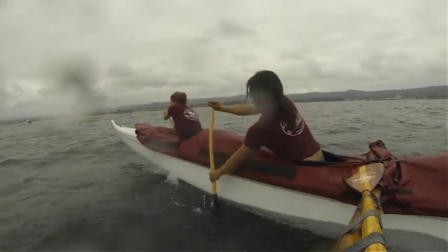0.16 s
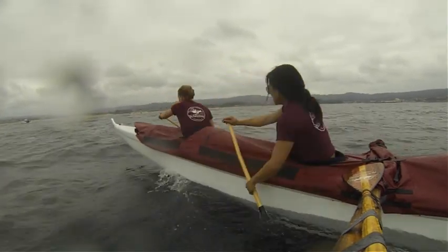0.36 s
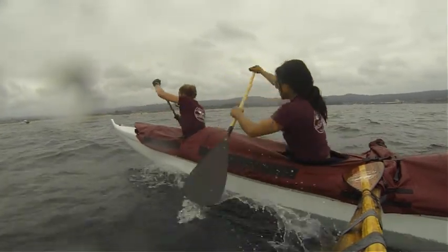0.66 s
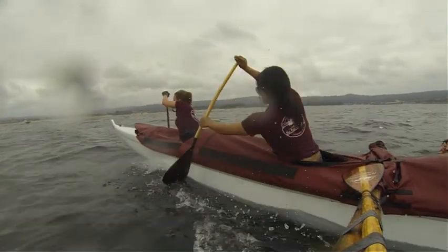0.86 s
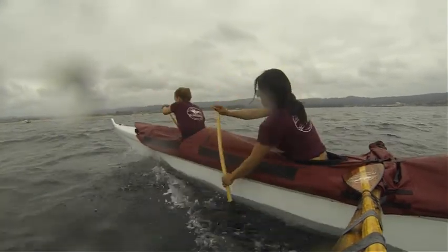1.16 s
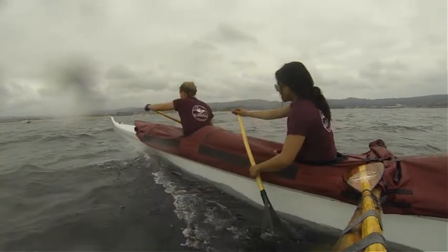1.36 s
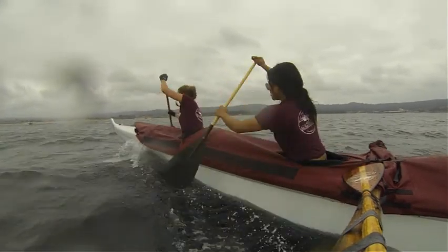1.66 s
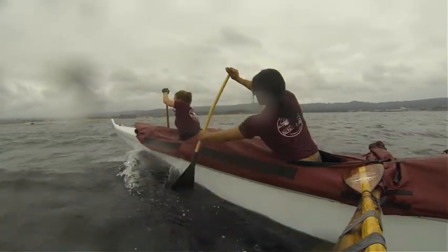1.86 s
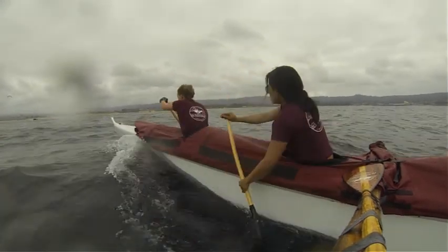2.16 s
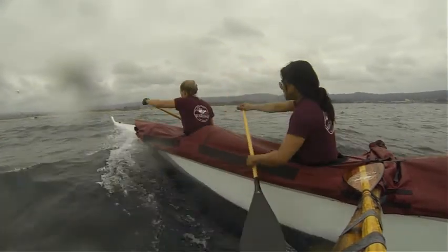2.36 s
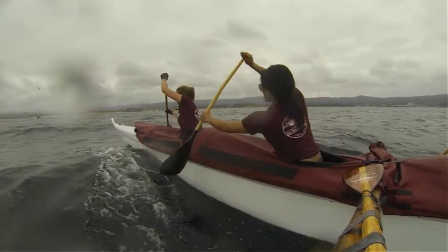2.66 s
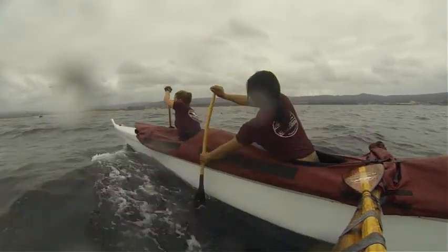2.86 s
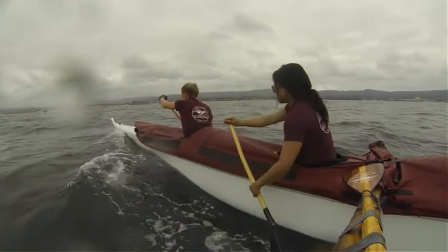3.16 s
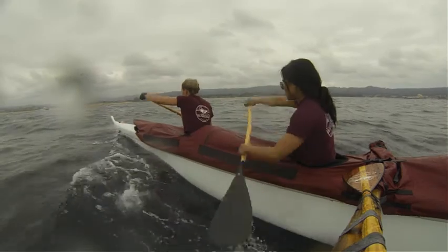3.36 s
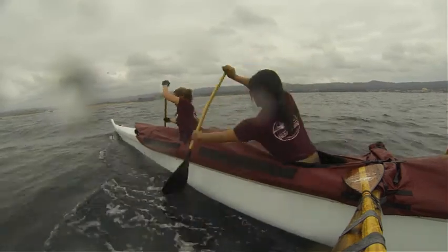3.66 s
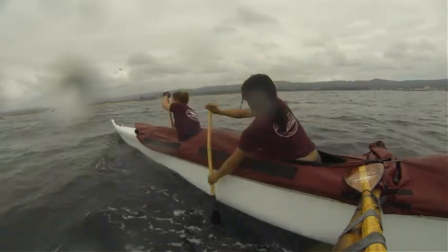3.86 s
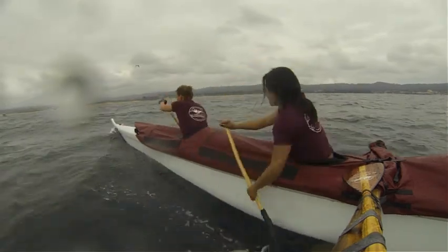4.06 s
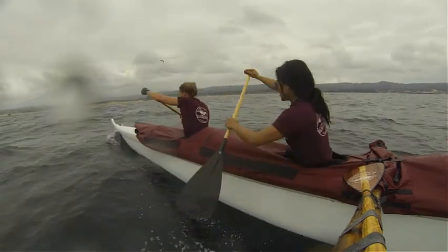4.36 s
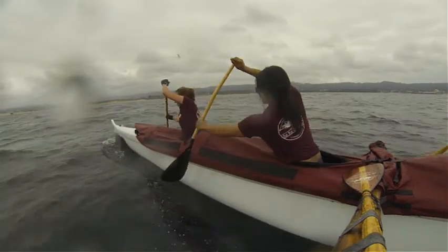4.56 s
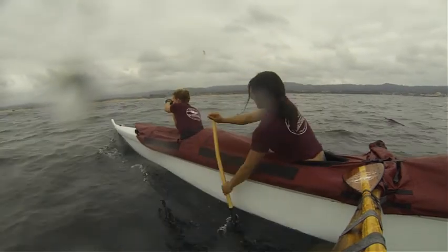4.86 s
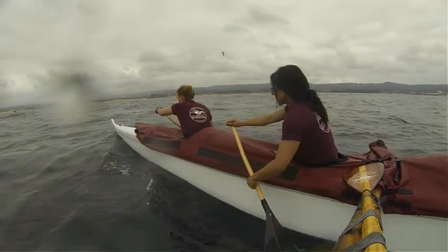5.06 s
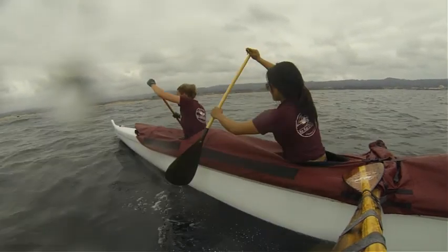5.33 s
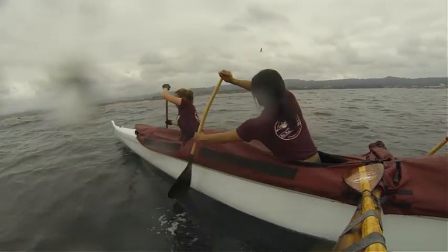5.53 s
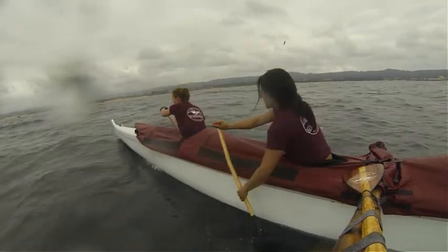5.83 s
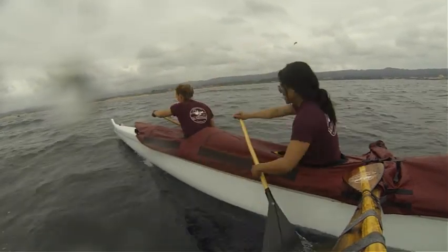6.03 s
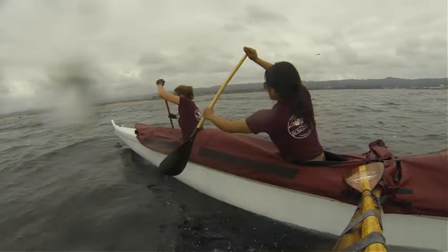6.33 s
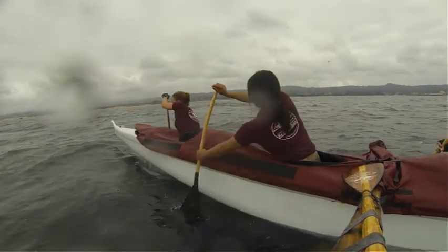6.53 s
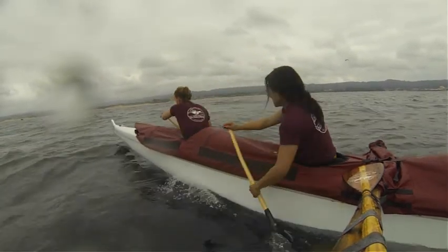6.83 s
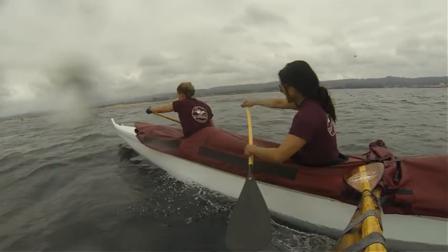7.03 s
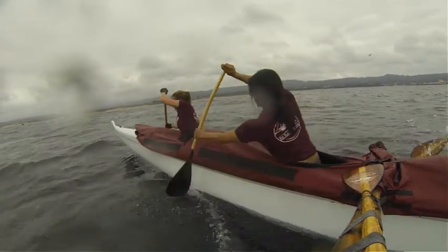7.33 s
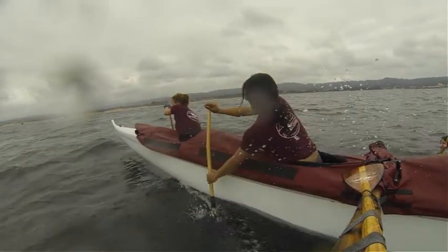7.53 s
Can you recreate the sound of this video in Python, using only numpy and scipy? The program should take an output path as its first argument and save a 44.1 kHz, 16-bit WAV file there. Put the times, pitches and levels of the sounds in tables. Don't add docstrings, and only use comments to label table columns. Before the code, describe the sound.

Heard through a sealed camera fixed to a canoe's outrigger arm: waves slap the hollow hull with low, drumlike booms, wavelets gulp and gurgle, and the float thuds deeply. A hard slap at 2.5 seconds knocks the shell, paddle splashes follow, slaps crowd together after 5.5, and a loud splash comes near the end. Thin spray patters throughout.

```python
import sys
import numpy as np
from scipy import signal
from scipy.fft import rfft, irfft, next_fast_len
from scipy.io import wavfile
from scipy.ndimage import uniform_filter1d, map_coordinates

SR = 44100
rng = np.random.default_rng(int(sys.argv[2]) if len(sys.argv) > 2 else 0)


def file_out(sig):
    cols = np.atleast_2d(sig).T
    lim = np.clip(cols, -1, 1)
    pcm = np.round(lim * 32767).astype(np.int16)
    wavfile.write(sys.argv[1], SR, pcm)


def boost_factor(decibels):
    exponent = np.asarray(decibels, float) / 20
    return 10 ** exponent


N = 339040
T = np.arange(N) / SR

# time_s, level_db
SPRAY_LEVEL = [(0.0, -51.5), (0.51, -57.5), (0.79, -56), (1.26, -58.5), (1.43, -61), (2.08, -55.5),
               (2.78, -58.5), (3.25, -57), (3.53, -56.5), (4.37, -56.5), (4.45, -57.5), (4.63, -51.5),
               (5.42, -56), (5.67, -49), (6.19, -54), (6.29, -58.5), (7.24, -54), (7.69, -54.5)]
# start_s, length_s, level_db, gurgle_rel_db
SPRAY_SHEETS = [(0.005, 0.073, -46, 1), (0.522, 0.11, -48, 0.5), (0.747, 0.04, -51, 1.5),
                (0.824, 0.1, -47, -1), (0.945, 0.087, -50, -2), (1.545, 0.036, -50, 0),
                (1.862, 0.063, -40.5, -1), (1.955, 0.024, -44, 3.5), (2.084, 0.014, -46, -6),
                (2.51, 0.025, -45, 3), (3.106, 0.12, -44, 1), (3.434, 0.079, -40, -4.5),
                (3.772, 0.017, -43, -4), (3.945, 0.069, -45.5, -1.5), (4.053, 0.044, -45, -1),
                (4.444, 0.23, -45, 3), (4.74, 0.14, -45, 3.5), (4.931, 0.071, -47.5, 3),
                (5.045, 0.23, -45, -5), (5.428, 0.086, -50.5, 4.5), (5.688, 0.03, -55, 4),
                (5.81, 0.055, -46, 2.5), (6.253, 0.086, -43, -0.5), (6.52, 0.12, -47, 1),
                (6.851, 0.061, -48, -2.5), (7.289, 0.084, -48, -4), (7.52, 0.05, -41.5, -3.5),
                (7.656, 0.015, -55.5, -11)]
# freq_hz, gain_db
FIZZ_COLOUR = [(1060, -25), (1800, 3.5), (2360, -3.5), (3080, -1), (3900, -7.5), (4170, -7.5), (5210, -9.5),
               (5960, -13.5), (7800, -10.5), (8980, -13.5), (11700, -62), (19800, -120)]
# start_s, peak_db, pitch_hz
FINE_SPRAY = [(0.192, -50, 2330), (0.2179, -54, 2550), (0.2483, -53, 2550), (0.5018, -55, 2600),
              (0.5447, -49.5, 2370), (1.0016, -47.5, 3200), (1.2291, -50.5, 2400), (1.6606, -48, 3100),
              (1.8168, -50, 3170), (2.1869, -51, 2470), (2.5062, -53.5, 2490), (2.9377, -48, 3230),
              (3.1448, -41, 3150), (3.3588, -55, 2560), (3.4421, -51.5, 2990), (3.7658, -55, 2690),
              (3.8302, -47, 3290), (3.9394, -45, 3270), (3.9779, -49.5, 2840), (4.4897, -52, 2560),
              (5.0823, -47, 2650), (5.1223, -52, 3200), (5.3532, -56, 2300), (5.7653, -52.5, 2350),
              (5.8012, -50, 3200), (5.8676, -53, 3050), (6.2018, -56, 2990), (6.2482, -50, 2450),
              (6.3555, -54, 3150), (6.5959, -51, 3090), (6.7082, -47, 3180), (6.8578, -45.5, 3130),
              (6.9037, -53, 2750), (6.979, -51, 3060), (7.2814, -50, 3210), (7.4096, -50.5, 2890),
              (7.4525, -48, 2460), (7.5283, -48.5, 2480), (7.5582, -50, 3060), (7.6016, -52.5, 2360)]
# start_s,
# peak_db, pitch_hz, t60_s
GLINTS = [
    (3.42, -53, 5300, .12),
    (3.475, -52, 5250, .12),
    (3.767, -54.5, 5300, .09),
    (2.8, -46.5, 4200, .04),
    (7.53, -52, 5250, .07),
]
# start_s, peak_db, pitch_hz
SPLASHES = [(0.1989, -44, 1270), (0.519, -35.5, 1370), (0.5801, -41, 1320), (0.751, -36, 1287),
            (0.818, -42.5, 1397), (0.889, -34, 1280), (1.231, -42, 1340), (1.5569, -40, 1330),
            (1.6931, -43.5, 1420), (1.8554, -36.5, 1266), (1.9031, -34, 907), (1.957, -35.5, 1474),
            (2.1874, -42, 1386), (2.5042, -37, 1010), (2.597, -46, 1057), (3.1238, -32, 1380),
            (3.1872, -36, 1437), (3.2328, -39, 1265), (3.3603, -37, 1326), (3.4206, -36.5, 1500),
            (3.474, -29, 1340), (3.5133, -28, 1290), (3.7663, -29.5, 1460), (3.9396, -43, 1130),
            (4.0632, -37, 1344), (4.2482, -43, 1360), (4.362, -43, 977), (4.4378, -37.5, 1350),
            (4.4884, -30, 1344), (4.726, -42, 1240), (4.784, -33, 1300), (4.9332, -37.5, 1447),
            (5.0785, -35, 1412), (5.1826, -33, 1433), (5.4296, -31, 1380), (5.4979, -36, 1300),
            (5.6301, -41, 1300), (6.2555, -33, 1410), (6.3193, -33, 1396), (6.5924, -43, 1280),
            (6.6396, -40, 1210), (6.7102, -36.5, 1250), (6.854, -41, 1230), (6.9094, -44, 1260),
            (7.285, -41, 1010), (7.3206, -38.5, 1230), (7.4097, -40, 1540), (7.5249, -25, 1350),
            (7.5901, -36, 1210), (7.6532, -33, 1350)]
# start_s, peak_db,
# pitch_hz, t60_s
MORE_SPLASHES = [(3.146, -28, 1600, 0.078), (3.14, -33, 790, .06), (3.455, -33.5, 1550, .07),
                 (4.55, -32, 1400, .08), (5.045, -34, 1300, 0.053), (5.812, -21, 480, 0.11),
                 (5, -39, 1100, 0.09), (6.64, -41, 1000, 0.067), (7.528, -31.5, 1200, 0.035),
                 (4.575, -34, 1500, 0.077), (4.68, -34, 1250, .06), (5.7, -39, 1330, .07),
                 (7.553, -36.5, 1650, 0.053), (3.772, -31, 1300, 0.077), (7.2, -41.5, 1400, 0.091), ]
# centre_hz, width_hz, gain_db
CASE_MODES = [(993, 390, -5), (1340, 240, 1), (1558, 303, -3.5)]
# centre_hz, width_hz, gain_db
PANEL_MODES = [(490, 52, 2), (708.5, 30, 3.5), (924, 200, -9)]
# start_s, peak_db, centre_hz, t60_s
PANEL_GULPS = [(0.089, -32, 990, 0.06), (0.6, -33.5, 870, 0.062), (1.231, -36.5, 683, 0.053),
               (6.585, -34, 710, 0.12), (2.185, -30, 487, 0.14), (2.392, -28, 493, 0.13),
               (2.394, -32, 720, .07), (2.504, -17.5, 698, 0.1), (2.506, -18.5, 495, .1),
               (3.084, -28, 748, 0.06), (3.138, -29, 490, 0.078), (3.521, -24.5, 757, 0.12),
               (3.776, -35, 714, 0.32), (3.935, -37, 480, 0.067), (4.072, -38, 710, 0.16),
               (4.516, -23, 460, 0.08), (4.532, -23.5, 656, 0.081), (4.796, -40, 692, 0.1),
               (4.868, -32.5, 700, 0.12), (5.006, -33, 470, 0.11), (5.294, -30, 713, 0.1),
               (5.75, -31, 560, 0.1), (5.495, -27.5, 445, 0.21), (5.571, -27.5, 672, 0.24),
               (5.832, -19.5, 674, 0.12), (5.804, -16.5, 699, 0.089), (6.261, -28, 680, 0.13),
               (6.336, -27, 756, 0.091), (0.746, -41, 513, 0.061), (0.82, -39, 667, 0.11),
               (0.864, -30, 500, 0.071), (0.907, -37, 490, .07), (1.495, -41, 514, 0.084),
               (1.903, -33.5, 860, 0.061), (1.968, -29.5, 676, 0.22), (2.068, -40, 694, 0.045),
               (3.029, -35, 527, 0.064), (4.636, -29, 520, 0.068), (4.712, -35, 503, 0.06),
               (5.124, -32, 718, 0.23), (6.852, -38, 697, 0.077), (7.273, -41.5, 549, 0.06),
               (7.377, -36, 530, 0.08), (7.57, -27.5, 686, 0.16), (6.362, -35, 696, 0.072),
               (7.527, -39, 547, 0.062)]
# centre_hz, width_hz, gain_db
FLANK_MODES = [(324.4, 91, -1), (405, 37, -0.5)]
# start_s, peak_db
FLANK_LICKS = [(0.333, -44), (0.794, -43), (0.883, -37), (1.894, -37.5), (2.2, -36.7), (2.242, -37.3),
               (3.004, -38), (3.161, -38), (3.979, -40), (4.045, -38), (4.215, -35.5), (4.733, -36),
               (5.413, -40), (7.072, -39), (7.28, -35.5), (7.524, -39.5)]
# time_s, level_db
SWAY_LEVEL = [(0.0, -22), (0.25, -23), (0.45, -39), (0.83, -19), (1.09, -38), (1.39, -28), (1.93, -40),
              (3.51, -25), (3.94, -45), (4.3, -27), (4.9, -24), (5.03, -36), (5.67, -27), (5.8, -36),
              (6.4, -26), (6.55, -40), (7.54, -24), (7.69, -40)]
# start_s, length_s, level_db
HEAVES = [(0.037, 0.066, -27), (0.237, 0.53, -33.5), (0.935, 0.083, -31), (1.207, 0.041, -42),
          (1.51, 0.2, -37.5), (2.324, 0.44, -34.5), (2.804, 0.066, -45.5), (3.031, 0.49, -36),
          (3.726, 0.078, -34), (3.875, 0.15, -41.5), (4.217, 0.077, -28.5), (4.319, 0.8, -39),
          (5.514, 0.056, -40), (5.92, 0.41, -42), (6.692, 0.033, -36), (6.913, 0.14, -30.5),
          (7.377, 0.26, -32)]
# start_s, peak_db, pitch_hz, t60_s
FLOAT_THUDS = [(0.386, -22, 76.7, 0.23), (0.6, -28, 57, 0.13), (1.498, -30.5, 87, 0.091),
               (2.382, -27.5, 57.7, 0.37), (2.503, -33.5, 83, 0.12), (3.047, -27, 112, 0.24),
               (3.349, -23, 57, 0.15), (4.198, -29, 74.4, 0.094), (4.93, -33, 104.4, 0.25),
               (5.988, -21.5, 72.7, 0.15), (6.954, -20.5, 59.3, 0.079)]
# centre_hz, width_hz, gain_db
ARM_SLOW_MODES = [(17.32, 4.6, 0)]
ARM_FAST_MODES = [(33.4, 9.8, 3.5), (92, 74, -10)]
# time_s, level_db
CHOP_LEVEL = [(0.0, -25.5), (0.15, -38), (0.49, -39), (0.56, -38), (1.35, -42.5), (1.99, -39),
              (2.48, -37.5), (2.78, -41), (3.08, -43.5), (3.32, -40), (3.81, -38), (4.67, -32.5),
              (4.97, -35), (5.33, -39), (5.85, -39.5), (6.38, -37), (7.02, -40.5), (7.69, -39.5)]
# start_s, length_s, level_db
HULL_WAVES = [(0.005, 0.131, -27.5), (0.382, 0.044, -32), (0.527, 0.029, -34.5), (0.586, 0.03, -36),
              (0.84, 0.13, -32.5), (1.905, 0.049, -35), (1.984, 0.047, -36.5), (2.146, 0.036, -38.5),
              (2.379, 0.05, -35.5), (2.514, 0.1, -28.5), (3.136, 0.15, -29.5), (3.356, 0.19, -31.5),
              (3.707, 0.044, -37.5), (4.082, 0.16, -31.5), (4.308, 0.052, -36.5), (4.46, 0.032, -41),
              (4.51, 0.079, -35.5), (4.628, 0.051, -31.5), (4.726, 0.046, -36), (4.8, 0.03, -40),
              (4.865, 0.089, -35), (4.975, 0.051, -34.5), (5.093, 0.071, -33), (5.524, 0.036, -35),
              (5.571, 0.16, -32), (5.811, 0.232, -29), (6.955, 0.062, -30.5), (7.011, 0.03, -45),
              (7.361, 0.036, -33.5), (7.55, 0.04, -36)]
# centre_hz, width_hz, gain_db
UPPER_DRUM_MODES = [(232.6, 15.3, -2), (320, 122, -16), (376, 72, -15)]
LOWER_DRUM_MODES = [(143.5, 11, -10), (192.8, 25, -21.5)]
# centre_hz, width_hz, gain_db
DRUM_CORE = [(232, 110, 0)]
# start_s, peak_db, flank_rel_db, t60_s
WAVE_SLAPS = [(0.056, -12.5, -22, 0.23), (0.189, -26, -16, 0.086), (0.008, -22, -12, 0.23),
              (0.394, -13.5, -13, 0.17), (0.523, -29, -5.5, 0.21), (0.586, -24, -17, 0.14),
              (0.881, -18, -18, 0.14), (1.646, -30.5, -5.5, 0.2), (1.87, -25, -22, 0.56),
              (2.357, -25, -15, 0.4), (2.51, -9, -17.5, 0.14), (3.111, -21, -16, 0.26),
              (3.158, -15.5, -13, 0.22), (5.612, -16.5, -24, 0.18), (3.637, -20.5, -15, 0.05),
              (3.69, -22.5, -33, 0.17), (4.194, -14.5, -27, 0.14), (4.379, -17.5, -25.5, 0.19),
              (4.529, -22, -12.5, 0.25), (4.769, -14, -20, 0.13), (4.895, -16.5, -31, 0.1),
              (5.583, -18, -13, 0.3), (5.697, -26, -10, 0.62), (5.816, -21, -6, 0.2),
              (5.994, -18, -13.5, 0.068), (6.278, -26, -15, 0.29), (6.768, -26, -31, 0.067),
              (6.874, -25.5, -17.5, 0.13), (6.96, -18, -15.5, 0.087), (0.3, -24.5, -33, 0.25),
              (2.185, -29.5, -8, 0.089), (3.453, -28.5, -5.5, 0.12), (4.082, -34, -4, 0.086),
              (4.642, -22, -13, 0.17), (4.58, -22, -22, .25), (5.74, -28, -9.5, 0.063),
              (6.086, -30, -11, 0.11), (6.717, -29, -12, 0.18), (7.27, -32.5, -7.5, 0.17),
              (1.513, -31.5, -6.5, 0.076), (2.61, -26.5, -20, 0.11)]
# start_s, peak_db
DRUM_TAPS = [(0.753, -31.5), (0.997, -27.5), (1.2, -32.5), (1.295, -33), (1.932, -26), (2.066, -30.5),
             (2.134, -30.5), (2.274, -31.5), (2.543, -22.5), (2.657, -33.5), (3.517, -28.5), (3.583, -30),
             (3.81, -27), (3.971, -32.6), (4.302, -29.0), (4.478, -26.5), (4.686, -23.5), (5.042, -27.5),
             (5.422, -28.5), (5.885, -28), (6.042, -27.5), (6.123, -28.5), (6.364, -24.5), (7.112, -31.3),
             (7.357, -27.5), (7.44, -31.5)]
# start_s, length_s, above_hz
TREBLE_GAPS = [(.517, .012, 6200), (2.491, .012, 3300), (3.746, .017, 6000), (5.906, .016, 6500),
               (7.508, .013, 6500), (1.501, .008, 8400), (1.78, .012, 8400), (2.981, .012, 8400),
               (3.308, .014, 8400), (7.66, .02, 3600)]
# low_hz, high_hz, rarity
HOLE_BANDS = [
    (1850, 2600, 1.6),
    (8300, 9300, .8),
]

SLAP_RISE_S = 0.0046


def unit(x):
    return x / np.sqrt(np.mean(x ** 2) + 1e-20)


def add(out, s, x):
    out[round(s * SR):][:len(x)] += x


def curve(rows):
    s, level_db = np.transpose(rows)
    return np.interp(T, s, level_db)


def follows(level_db, mean_db, grows):
    return mean_db + grows * (level_db - level_db.mean())


def wobble(knots_per_s):
    return map_coordinates(rng.standard_normal(int(N * knots_per_s / SR) + 4), [T * knots_per_s])


def surges(rest_db, start_s, length_s, level_db, rise_s, fall_db_per_s):
    coarse_s = T[::64]
    since_s = coarse_s[:, None] - start_s
    fall_db = fall_db_per_s * np.maximum(since_s - length_s, 0)
    gain = np.clip(1 + since_s / rise_s, 0, 1) * boost_factor(level_db - fall_db)
    power = np.interp(T, coarse_s, (gain ** 2).sum(axis=1))
    return 10 * np.log10(boost_factor(2 * rest_db) + power)


def swell(t60_s, rise_s, hold=1.267):
    t = T[:SR // 3]
    decay = boost_factor(-60 * (t / max(t60_s, .01)) ** hold)
    shape = decay * (1 - np.exp(-t / max(rise_s, .0004))) ** 2
    return shape / shape.max()


def filtered(x, response):
    m = next_fast_len(len(x) + min(SR // 2, len(x) // 3))
    return irfft(rfft(x, m) * response(np.fft.rfftfreq(m, 1 / SR)), m)[:len(x)]


def ring(x, modes, steep=1, soft_poles=2):
    def response(f):
        total = 0
        for k, (centre, width, db) in enumerate(modes):
            mode = 1j * f * width / (centre * centre - f * f + 1j * f * width)
            total = total + (-1) ** k * boost_factor(db) * mode ** steep
        return total / (1 + 1j * f / (1.37 * modes[-1][0])) ** soft_poles
    return filtered(x, response)


def rattle(modes, shape, steep=1, strike=0.46):
    push = rng.standard_normal(len(shape)) * shape
    push[np.argmax(shape) // 2] += strike * np.linalg.norm(push)
    x = ring(push, modes, steep)
    return x / np.abs(x).max()


def steadied(x, span_s, share):
    level = np.sqrt(np.abs(uniform_filter1d(x ** 2, round(span_s * SR))) + 1e-20)
    return unit(x / level ** np.clip(share, 0, 1))


def turbulence(per_s, spread_db, drops_db, lumps_db, lump_rate):
    sizes_db = np.minimum(spread_db * rng.exponential(size=N), 14)
    hits = (rng.random(N) < per_s / SR) * rng.choice([-1, 1], N) * boost_factor(sizes_db)
    rush = rng.standard_normal(N) * boost_factor(lumps_db * wobble(lump_rate))
    return unit(rush) + boost_factor(drops_db) * unit(hits)


def patchy(x, depth_db, hz_bins, frames):
    z = signal.stft(x, nperseg=512)[2]
    field = uniform_filter1d(rng.standard_normal(z.shape), hz_bins, axis=0)
    field = uniform_filter1d(field, frames, axis=1)
    return unit(signal.istft(z * boost_factor(depth_db * unit(field)), nperseg=512)[1][:N])


def bubbles(count, centre_hz, spread, cycles, spread_db):
    when = rng.random(count)
    pitch = np.clip(rng.standard_normal(count), -2, 1.5)
    size_db = np.minimum(spread_db * rng.exponential(size=count), 15)
    turns = (centre_hz * np.exp(spread * pitch))[:, None] * T[:SR // 20]
    envelope = np.exp(-turns / cycles) * (1 - np.exp(-turns / 1.8))
    grain = boost_factor(size_db)[:, None] * envelope * np.sin(2 * np.pi * turns * (1 + .002 * turns))
    where = (when * N).astype(int)[:, None] + np.arange(SR // 20)
    return unit(np.bincount(where.ravel(), grain.ravel(), N + SR)[:N])


def fizzy(x):
    f, db = np.transpose(FIZZ_COLOUR)
    return filtered(x, lambda hz: boost_factor(np.interp(np.log(hz + 1), np.log(f), db)))


def spray():
    spray_db = curve(SPRAY_LEVEL)
    start, length, db, gurgle_rel_db = np.transpose(SPRAY_SHEETS)

    def sheets(rest_db, peak_db):
        return surges(rest_db, start, length, peak_db, rise_s=0.011, fall_db_per_s=263.5)

    patter_db = sheets(spray_db + 2.0, db - 3.0)
    gurgle_db = sheets(follows(spray_db, mean_db=-56, grows=1.4), db + gurgle_rel_db - 3.5)
    fizz_db = sheets(follows(spray_db, mean_db=-65.5, grows=0.33), follows(db, mean_db=-67, grows=0.58))

    shower = turbulence(per_s=250, spread_db=6, drops_db=-7, lumps_db=1.8, lump_rate=35)
    gulping = turbulence(per_s=100, spread_db=4, drops_db=-7, lumps_db=3, lump_rate=40)
    fine = turbulence(per_s=300, spread_db=7.3, drops_db=-5, lumps_db=0.23, lump_rate=30)

    panels = steadied(ring(0.32 * shower + gulping, PANEL_MODES), span_s=.04, share=.5)
    pockets = bubbles(count=350, centre_hz=680, spread=.18, cycles=7, spread_db=1.5)
    gurgle = patchy(panels, depth_db=2.4, hz_bins=2, frames=4) + 0.4 * pockets

    case = steadied(ring(shower, CASE_MODES, steep=2), span_s=.04, share=.4)
    pops = bubbles(count=500, centre_hz=1306, spread=.14, cycles=9.8, spread_db=0.0)
    patter = patchy(case, depth_db=2.6, hz_bins=3, frames=4) + 0.59 * pops

    fizz = patchy(fizzy(0.6 * shower + fine), depth_db=2.9, hz_bins=3, frames=4)
    patter_gain = boost_factor(patter_db - 1.5 + 1.6 * wobble(28))
    return patter_gain * unit(patter) + boost_factor(gurgle_db + 1.0) * unit(gurgle) + boost_factor(fizz_db + 2.5) * fizz


def splashes():
    out, hiss = np.zeros((2, N + SR))
    splash_t60_s, fine_t60_s = .08, .055
    for s, db, hz, t60 in [*((*row, splash_t60_s) for row in SPLASHES), *MORE_SPLASHES]:
        shape = swell(t60, rise_s=0.003)
        add(out, s - .003, boost_factor(db - 1.5) * rattle([(hz, 297, 0)], shape, steep=2.85, strike=.85))
    for s, db, hz, t60 in [*((*row, fine_t60_s) for row in FINE_SPRAY), *GLINTS]:
        shape = swell(t60, rise_s=0.002)
        add(out, s - .002, boost_factor(db - 5.5) * rattle([(hz, 500, 0)], shape, steep=1.8))
        add(hiss, s - .002, boost_factor(db - 7.5) * shape * rng.standard_normal(len(shape)))
    return (out + fizzy(hiss))[:N]


def arm():
    slow_db = curve(SWAY_LEVEL)
    rest_db = follows(curve(CHOP_LEVEL), mean_db=-40, grows=0.47)
    fast_db = surges(rest_db, *np.transpose(HEAVES), rise_s=0.013, fall_db_per_s=144.5)

    slow = ring(rng.standard_normal(N + SR), ARM_SLOW_MODES)[SR:]
    slow = steadied(slow, span_s=0.057, share=0.47)
    push = turbulence(per_s=32, spread_db=3.9, drops_db=-2.5, lumps_db=2.1, lump_rate=5.4)
    fast = steadied(ring(push, ARM_FAST_MODES), span_s=0.11, share=0.8)

    thuds = np.zeros(N + SR)
    for s, db, hz, t60 in FLOAT_THUDS:
        shape = swell(0.83 * t60, rise_s=0.0041)
        add(thuds, s, boost_factor(db) * shape * np.sin(2 * np.pi * hz * T[:len(shape)]))

    start_swing = -boost_factor(-20.5 - 60 * T / 0.13) * np.cos(2 * np.pi * ARM_SLOW_MODES[0][0] * T)
    return boost_factor(slow_db + .6) * slow + boost_factor(fast_db - 2.4) * fast + thuds[:N] + start_swing


def slaps():
    out = np.zeros(N + SR)
    for s, db, flank_db, t60 in WAVE_SLAPS:
        shape = swell(t60, 0.23 * SLAP_RISE_S)
        add(out, s - .008, boost_factor(db + flank_db + 3.5) * rattle(FLANK_MODES, shape))
    for s, db in FLANK_LICKS:
        shape = swell(0.1, SLAP_RISE_S)
        add(out, s - .003, boost_factor(db + 2.5) * rattle(FLANK_MODES, shape, strike=.9))
    for s, db, hz, t60 in PANEL_GULPS:
        shape = swell(t60, rise_s=0.00297)
        add(out, s - .003, boost_factor(db - 7.5) * rattle([(hz, 120, 0)], shape, steep=1.87, strike=0.73))
    return out[:N]


def blows():
    sag_share, waver_share, scatter_share = .04, .025, .012
    out, strength = np.zeros((2, N + SR))
    waver, flutter = np.pad([wobble(45), wobble(60)], ((0, 0), (0, SR)))
    hits = [(s - .004, db - 2.0, t60) for s, db, _, t60 in WAVE_SLAPS]
    hits += [(s, db + 0.56, 0.15) for s, db in DRUM_TAPS]
    for s, db, t60 in hits:
        shape = boost_factor(db - 1.2) * swell(.78 * t60, 1.3 * SLAP_RISE_S, hold=1.8)
        span = slice(round(s * SR), round(s * SR) + len(shape))
        sag = sag_share * (.5 - np.minimum(3 * T[:len(shape)] / t60, 1))
        scatter = scatter_share * rng.standard_normal()
        hz = UPPER_DRUM_MODES[0][0] * (1 + scatter + sag + waver_share * waver[span])
        tone = np.sin(2 * np.pi * np.cumsum(hz) / SR)
        add(out, s, shape * boost_factor(1.5 * flutter[span]) * tone)
        add(strength, s, shape)
    return out[:N], strength[:N]


def hull():
    chop_db = curve(CHOP_LEVEL)
    start, length, wave_db = np.transpose(HULL_WAVES)

    def waves(rest_db, peak_db):
        return surges(rest_db, start, length, peak_db, rise_s=0.021, fall_db_per_s=221)

    gulps_db = 3 * wobble(15)
    upper_db = waves(chop_db - 1.0 + gulps_db, wave_db - 4.5)
    lower_db = waves(follows(chop_db, mean_db=-47, grows=0.64), wave_db - 4)

    upper_push = turbulence(per_s=60, spread_db=4, drops_db=-3, lumps_db=1.5, lump_rate=20)
    lower_push = turbulence(per_s=40, spread_db=3.5, drops_db=1.3, lumps_db=1.8, lump_rate=10)
    upper = steadied(ring(upper_push, UPPER_DRUM_MODES), span_s=.05, share=.6)
    lower = steadied(ring(lower_push, LOWER_DRUM_MODES), span_s=0.084, share=0.63)

    rung, strength = blows()
    murmur_gain = boost_factor(upper_db - 0.2)
    overridden = 1 - 1 / (1 + 1.1 * strength / murmur_gain)
    murmur = upper - overridden * ring(upper, DRUM_CORE, soft_poles=0)
    return murmur_gain * murmur + rung + boost_factor(lower_db + 2.5) * lower


def scene():
    return (arm() + hull() + spray() + slaps() + splashes())[None]


def converted(x):
    beat_hz, tilt_hz = 3889.6, 1500
    slip_samples = 1.21 * ((T * beat_hz) % 1 - .5)

    def tilt(hz):
        return 0.84 * np.sqrt(1 + (np.minimum(hz, 1800) / tilt_hz) ** 2)

    return x + slip_samples * filtered(np.gradient(x), tilt)


def starved(x):
    hz, t, z = signal.stft(x, SR, nperseg=256, noverlap=192)
    for s, length, low in TREBLE_GAPS:
        z = z * (1 - .98 * np.outer(hz > low, (t > s) & (t < s + length)))
    x = signal.istft(z, nperseg=256, noverlap=192)[1][:N]

    hz, t, z = signal.stft(x, SR, nperseg=1024)
    field = uniform_filter1d(rng.standard_normal(z.shape), size=5, axis=0)
    field = unit(uniform_filter1d(field, size=8, axis=1))
    for low, high, rarity in HOLE_BANDS:
        in_band = ((hz > low) & (hz < high))[:, None]
        z = z * (1 - .97 * (field > rarity) * in_band)
    return signal.istft(z, nperseg=1024)[1][:N]


def band_limit(x):
    return signal.sosfilt(signal.butter(12, 9300, fs=SR, output="sos"), x)


def record(dry):
    rounded = dry[0] / (1 + np.abs(dry[0] / .34) ** 4) ** (1 / 4)
    held = np.pad(converted(rounded), SR // 20, 'reflect')
    limited = filtered(held, lambda hz: (hz < 9300) / (1 + 1j * hz / 7000))[SR // 20:][:N]
    return band_limit(starved(limited)[None])


dry = scene()
out = record(dry)
file_out(out)
```